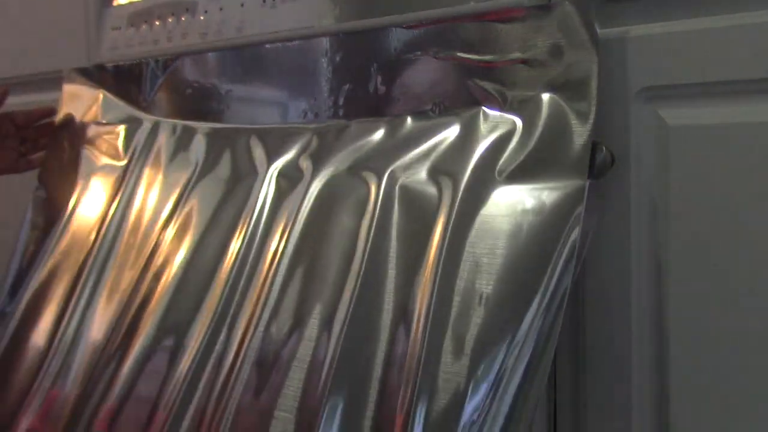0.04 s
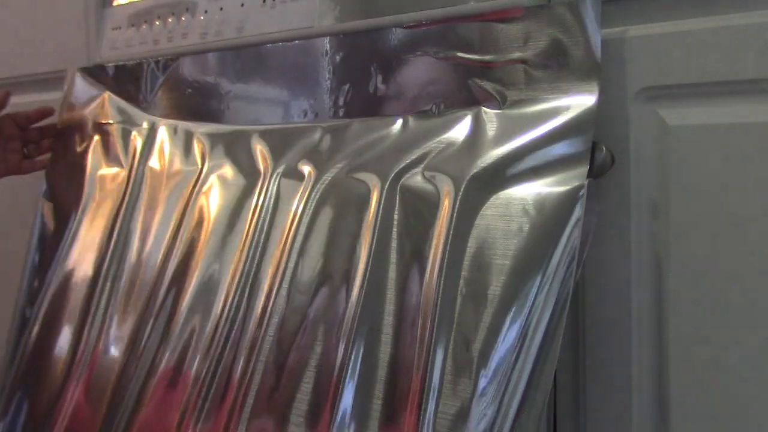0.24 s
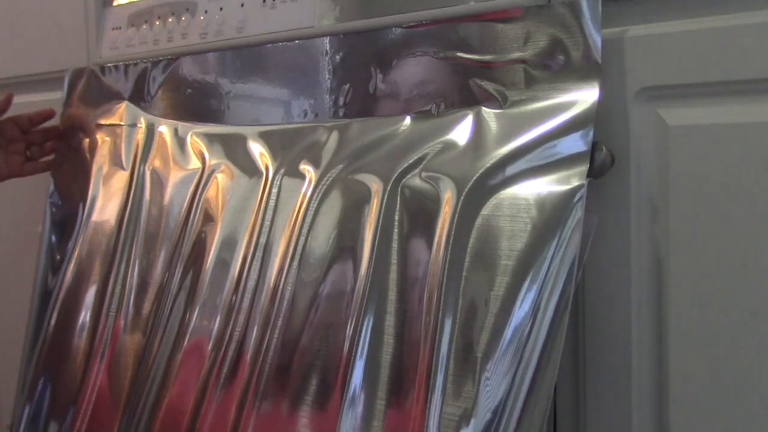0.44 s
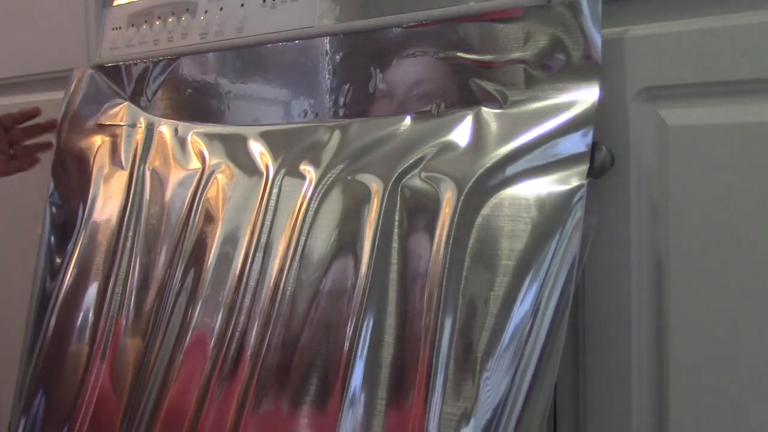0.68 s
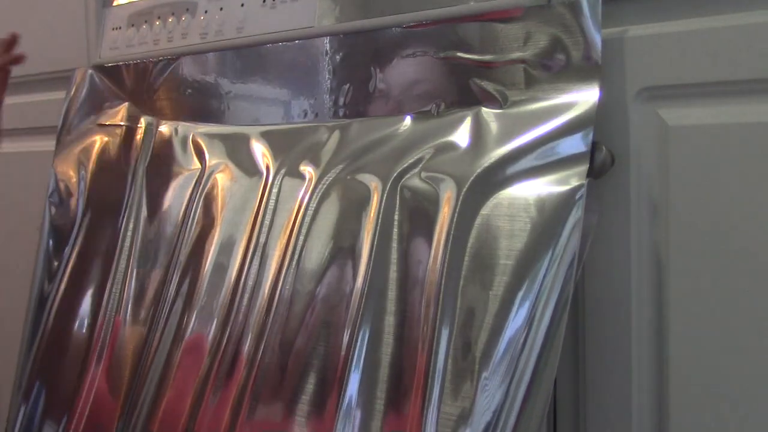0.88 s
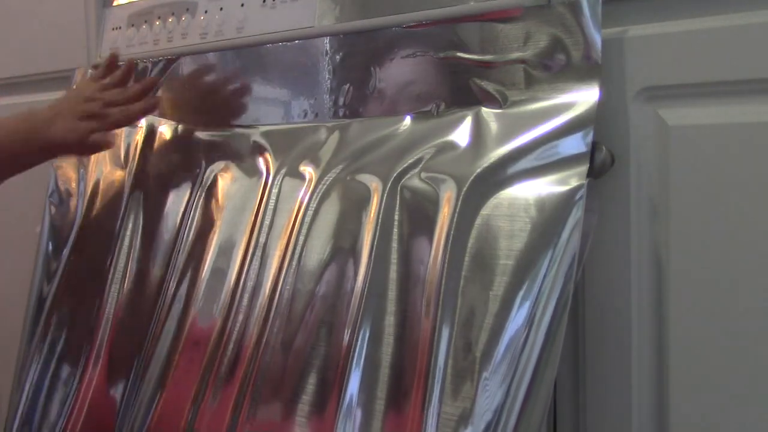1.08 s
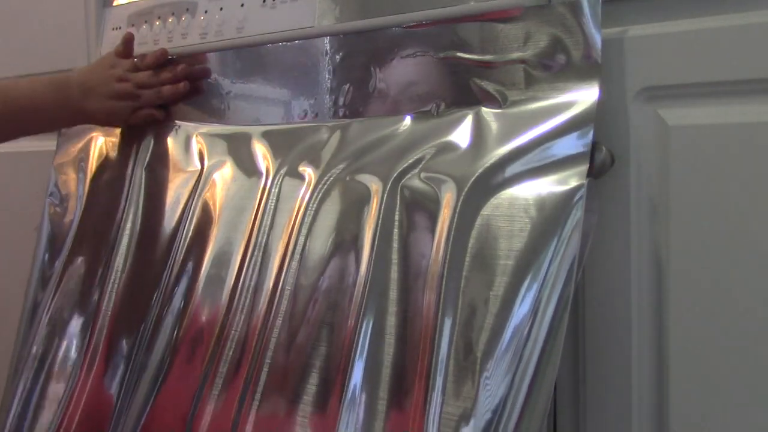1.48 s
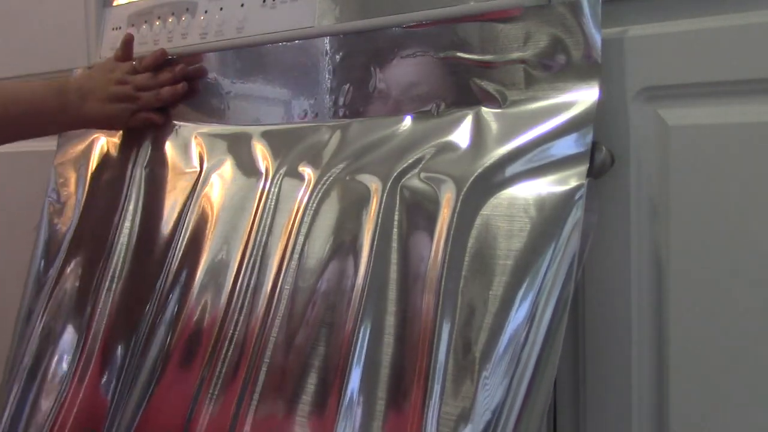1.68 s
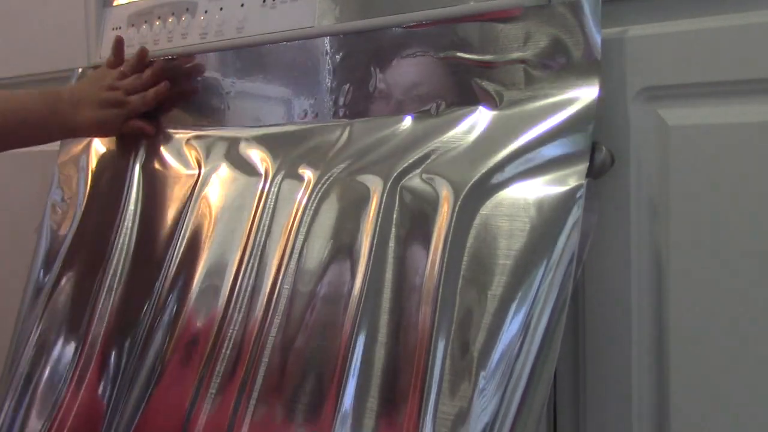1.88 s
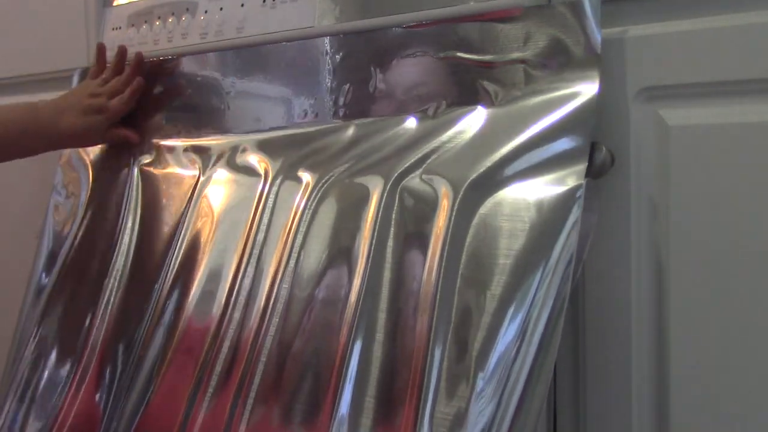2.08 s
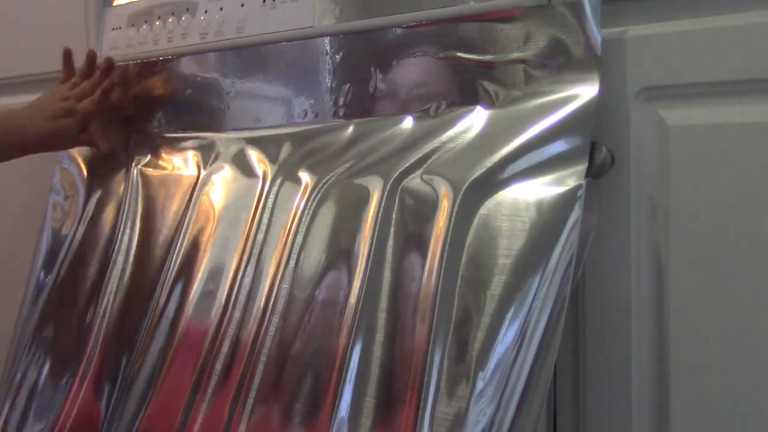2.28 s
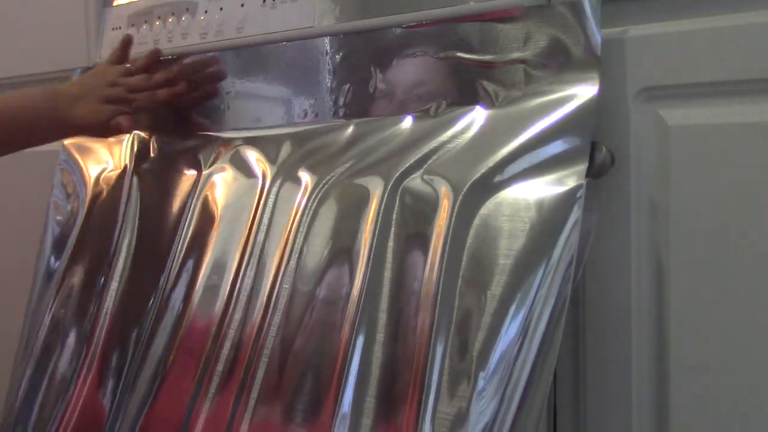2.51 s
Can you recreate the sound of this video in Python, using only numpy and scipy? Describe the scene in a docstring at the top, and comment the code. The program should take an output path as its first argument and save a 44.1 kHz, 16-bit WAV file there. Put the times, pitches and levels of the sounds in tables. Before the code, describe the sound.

Crinkling metallic film pops sharply, then a palm smooths it down with a hiss.

```python
"""A small quiet room, one close, almost mono microphone on a sheet of metallic adhesive film hanging at an
appliance. The loose film rustles as a hand presses it, and creases buckle with sharp snaps that flutter
through the sheet and ring in it. After a lull the palm lands at about 1.4 s and slides slowly, with a hiss
and a low rumble from the panel. From 1.8 s a faster, brighter stroke rubs the film flat through a second
run of snaps, dying away by 2.5 s."""
import sys
import numpy as np
from scipy import signal
from scipy.fft import rfft, irfft
from scipy.io import wavfile
from scipy.ndimage import uniform_filter1d, minimum_filter1d

SR = 44100
rng = np.random.default_rng(int(sys.argv[2]) if len(sys.argv) > 2 else 0)


def master_out(mix):
    """Clip the mix to full scale and print it as 16-bit PCM to the path in sys.argv[1]."""
    frames = np.transpose(np.atleast_2d(mix))
    ceiling = np.clip(frames, -1, 1)
    pcm = np.round(ceiling * 32767).astype(np.int16)
    wavfile.write(sys.argv[1], SR, pcm)


N = 116865

# Room tone, and its stereo width: freq_hz, relative_db
AIR_SPECTRUM = [(20, -37), (40, -30.5), (68, -8), (88, -12.5), (118, -0.5), (170, -10), (260, 1),
                (400, -4.5), (600, -7), (950, -13), (2000, -22), (4000, -29.5), (10000, -36.5),
                (13300, -43.5), (15000, -60)]
AIR_WIDTH = [(30, -14), (70, -16), (200, -18.5), (1000, -10), (4000, -5), (12000, -13)]
# Loose film rustling: time_s, level_db
RUSTLE_LEVELS = [(0, -41), (.1, -45), (.14, -46), (.23, -51.5), (.33, -41), (.39, -36.5), (.44, -40.5),
                 (.48, -44), (.53, -46), (.56, -70), (.65, -48), (.705, -48), (.735, -37), (.77, -51),
                 (.86, -54.5), (1.34, -87), (1.385, -33), (1.45, -44.5), (1.6, -66), (2.65, -79)]
# Its tone: freq_hz, relative_db
RUSTLE_SPECTRUM = [(60, -37), (250, -4.5), (600, -5.5), (1200, 2.5), (2600, -5), (4000, -8.5),
                   (7000, -10.5), (10000, -15.5), (13500, -24.5), (15000, -44)]
# Wall reflections by band: low_edge_hz, level_db, t60_s
ROOM_BANDS = [(107, 4.5, 0.31), (400, 6.5, 0.19), (900, -1.5, 0.23), (1800, -5, .29), (3500, -4, 0.25),
              (7040, -7.5, 0.14)]
# Buckling creases: start_s, build_ms, flutter_ms, pop_db, pop_low_hz, pop_high_hz, facet_hz,
# crack_db, crack_top_hz, thump_db, send_db (into the sheet and the room)
CREASES = [ (0.1477, 0.5, 7, -21.5, 540, 2050, 639, -54, 5000, -35, -2),
           (0.2465, .4, 5.8, -37, 576, 2150, 1170, -53, 9000, -45, 4.5),
           (0.2610, 6.7, 7, -31, 785, 1800, 1200, -70, 6000, -59, 1.5),
           (0.2753, 0.019, 8.1, -14, 930, 2700, 1219, -29.5, 4300, -43, -1.5),
           (0.3110, .5, 4.5, -32, 900, 2400, 1200, -48, 11000, -44, -5),
           (0.3275, .5, 4, -36, 900, 2400, 1210, -52, 10000, -59, 2),
           (0.3460, 0.25, 5.8, -23, 940, 1800, 1620, -38.5, 6000, -33, -2),
           (0.4024, 2.7, 4.7, -24.5, 805, 2740, 987, -33, 9300, -35, -1.5),
           (0.4335, 0.56, 3.7, -36, 900, 3380, 1020, -40.5, 8000, -48, -6),
           (0.5019, 2.2, 5.8, -35.5, 600, 2760, 2150, -42, 8000, -42, -3),
           (0.5100, 1, 2.6, -36, 400, 2050, 596, -55, 8000, -36.5, -14),
           (0.6417, 0.31, 4.7, -23.5, 840, 2780, 2030, -31.5, 9150, -37.5, -0.5),
           (0.68, 1.2, 4.5, -42, 1100, 3500, 2020, -42, 9200, -81, 7.5),
           (0.7242, 0.34, 3.2, -15, 1110, 2860, 2760, -23, 8000, -36, -3),
           (0.7523, 0.43, 6.7, -26.5, 600, 2430, 1320, -38.5, 8500, -46, -1),
           (1.3914, 0.77, 7, -23, 517, 2500, 597, -37.5, 8150, -29.5, -5),
           (1.5110, 0.28, 2.6, -32.5, 850, 1400, 965, -58, 6000, -37, -4.5),
           (1.7540, .3, 2.4, -42.5, 1600, 3000, 2190, -56, 6000, -43, 5),
           (1.8890, 0.38, 7, -31, 900, 2090, 1350, -60, 6000, -62, -2),
           (1.9259, 0.54, 2.6, -43.5, 800, 2920, 1300, -55, 5000, -41.5, 17),
           (1.9424, 3.5, 5.2, -18, 864, 1350, 986, -58, 4500, -30, -10),
           (2.1199, 0.12, 5.3, -16, 840, 2120, 1270, -43, 4500, -27, -8),
           (2.1602, .5, 2, -36, 1000, 2300, 1600, -57, 5950, -45, -7),
           (2.1665, 0.39, 4.7, -27, 790, 1800, 1240, -60, 6000, -39, -2.5),
           (2.182, 0.23, 3.5, -26.5, 1180, 2820, 1990, -60, 6000, -35, -7),
           (2.1879, .8, 4, -24, 800, 2340, 870, -55, 6000, -25, -2.5),
           (2.1986, 0.022, 3.9, -8.5, 1560, 2850, 1542, -31, 5500, -41, -7),
           (2.2310, 0.26, 1.8, -33, 2400, 4000, 3300, -41, 8000, -53, -10),
           (2.2462, 1.3, 4.4, -37, 1500, 4060, 2990, -42, 8000, -39, 2),
           (2.281, .3, 3.5, -36.5, 1200, 3500, 2000, -41.5, 9200, -52, 7.5),
           (2.3340, 0.4, 4.1, -19, 1310, 2380, 2890, -54, 4500, -39, -2), ]
# Resonances of the sheet and panel: pitch_hz, level_db, t60_s
SHEET_MODES = [(252, -13, 0.22), (334, -19, 0.6), (497, 15, 0.75), (634, 6, 0.083), (986, 11, .16),
               (1185, -2, 0.39), (1606, -12, 0.26), (1727, -29, 0.21), (2117, 5, 0.1), (2225, 10, .12),
               (2910, -6, 0.099)]
# First, slow stroke of the palm: time_s, level_db
SLOW_STROKE_LEVELS = [(1.3, -52), (1.42, -45), (1.53, -41), (1.65, -39.5), (1.69, -45), (1.74, -39),
                      (1.85, -53), (2.0, -38.5), (2.3, -70)]
# Its tone: freq_hz, relative_db
SLOW_STROKE_SPECTRUM = [(300, -12), (600, -0.5), (1000, -3.5), (2200, -6), (3200, -11), (4200, -13.5),
                        (5150, -10), (6000, -18.5), (9000, -20.5), (13500, -26.5), (15000, -50)]
# Panel rumbling under the palm: time_s, level_db
PANEL_LEVELS = [(1.3, -51.5), (1.42, -63), (1.56, -34.5), (1.66, -37.5), (1.7, -40.5), (1.77, -36),
                (1.88, -46.5), (1.99, -48), (2.1, -39.5), (2.3, -45), (2.45, -79)]
# Its tone: freq_hz, relative_db
PANEL_SPECTRUM = [(60, -37), (140, -5), (225, 2), (330, 4.5), (480, -8.5), (610, -8.5), (900, -20),
                  (2000, -55)]
# Second, faster and brighter stroke: time_s, level_db
FAST_STROKE_LEVELS = [(1.68, -78), (1.80, -40.5), (1.92, -41), (1.96, -45.5), (1.99, -37), (2.1, -37),
                      (2.22, -34.5), (2.3, -39.5), (2.38, -39), (2.42, -51), (2.5, -55)]
# Its tone: freq_hz, relative_db
FAST_STROKE_SPECTRUM = [(300, -3.5), (700, -5.5), (1500, 0.5), (2700, 2.5), (3700, -7.5), (5200, -6),
                        (7800, -5), (9200, -2), (11000, -11), (13500, -17), (15000, -42)]
# Stereo width by frequency, nearly mono and a little wider in the treble: freq_hz, gain_db
STEREO_WIDTH = [(100, -28), (500, -38), (1500, -21), (3000, -17.5), (5000, -16.5), (8000, -20),
                (12000, -9.5)]

ROOM_DELAY_S, ROOM_BUILD_S = 0.0056, 0.002
SLIPS_PER_S = 5000
CRACK_MS, THUMP_MS, FACET_T60_S = 4.1, 6.9, 0.038
SNAP_SAMPLES, LEAD_SAMPLES = SR // 10, SR // 50  # one snap, and the part before its click


def undb(db):
    """Decibels to gain."""
    return 10 ** (np.asarray(db) / 20)


def unit(x):
    """Scale to an energy of one."""
    return x / np.sqrt(np.sum(x ** 2) + 1e-18)


def band(x, low_hz, high_hz, order):
    """Causal band-pass; the order sets how steep the high edge is."""
    highpass = signal.butter(2, low_hz, "high", fs=SR, output="sos")
    lowpass = signal.butter(order, high_hz, fs=SR, output="sos")
    return signal.sosfilt(np.vstack([highpass, lowpass]), x)


def equalise(x, curve):
    """Filter by a curve of freq_hz, gain_db points."""
    hz, db = np.array(curve).T
    freqs = np.maximum(np.fft.rfftfreq(N, 1 / SR), 1)
    return irfft(rfft(x) * undb(np.interp(np.log(freqs), np.log(hz), db)), N)


def colour(x, spectrum):
    """Filter by a spectrum and scale to an rms of one."""
    return unit(equalise(x, spectrum)) * np.sqrt(N)


def room_tone(level_db=-43):
    """Still air in the room: a steady, low noise."""
    return colour(rng.standard_normal(N), AIR_SPECTRUM) * undb(level_db)


def friction(levels, spectrum, spread_db=3, smear_db=0):
    """Dense tiny slips of uneven size, smeared by the room, swelling along a level curve."""
    slips = (rng.random(N) < SLIPS_PER_S / SR) * rng.choice([-1, 1], N)
    slips = slips * undb(spread_db * np.minimum(rng.exponential(size=N), 6))
    swell = undb(np.interp(np.arange(N) / SR, *np.array(levels).T))
    return colour(slips + undb(smear_db) * room(slips), spectrum) * swell


def film_rustle():
    """The loose film rustles in tiny slips."""
    return friction(RUSTLE_LEVELS, RUSTLE_SPECTRUM, spread_db=2.5)


def room(x):
    """Dense reflections from near walls; the treble dies first."""
    t = np.arange(SR // 2) / SR
    freqs = np.fft.rfftfreq(len(t), 1 / SR)
    noise = rfft(rng.standard_normal(len(t)))
    onset = np.clip((t - ROOM_DELAY_S) / ROOM_BUILD_S, 0, 1)
    high_edges = [row[0] for row in ROOM_BANDS[1:]] + [SR / 2]
    tail = 0
    for (low_hz, level_db, t60_s), high_hz in zip(ROOM_BANDS, high_edges):
        reflections = irfft(noise * ((freqs >= low_hz) & (freqs < high_hz)), len(t))
        tail += undb(level_db) * reflections * unit(onset * np.exp(-np.log(1000) * t / t60_s))
    return signal.fftconvolve(x, tail)[:N]


def flutter(envelope):
    """Flutter through the sheet: a short noise burst with its strongest spectral peaks evened out."""
    spectrum = rfft(rng.standard_normal(len(envelope)) * envelope)
    return irfft(spectrum / np.sqrt(np.abs(spectrum) + 1e-12), len(envelope)) * np.sqrt(envelope)


def flip(build_ms, decay_ms, low_hz, high_hz, flutter_db=8.5, order=4):
    """One band of a crease flipping. Rows: click with flutter, bare click."""
    ms = (np.arange(SNAP_SAMPLES) - LEAD_SAMPLES) / SR * 1000
    envelope = np.exp(np.where(ms < 0, ms / max(build_ms, .02), -ms / decay_ms))
    click = unit(band(signal.unit_impulse(SNAP_SAMPLES, LEAD_SAMPLES), low_hz, high_hz, order))
    burst = unit(band(flutter(envelope), low_hz, high_hz, order))
    flutter_gain = undb(flutter_db) * (1 + build_ms)  # the slower the build-up, the less click
    return np.array([unit(click + flutter_gain * burst), click])


def crease_snaps():
    """Creases buckle: a pop, a ringing facet, a bright crack and a panel thump. Rows: direct, send."""
    track = np.zeros((2, N + SR))
    age_s = np.maximum(np.arange(SNAP_SAMPLES) - LEAD_SAMPLES, 0) / SR
    scale = np.sqrt(SR / 100)  # an energy of one becomes an rms of one over 10 ms
    for (start_s, build_ms, flutter_ms, pop_db, pop_low_hz, pop_high_hz, facet_hz,
         crack_db, crack_top_hz, thump_db, send_db) in CREASES:
        pop = flip(build_ms, flutter_ms, pop_low_hz, pop_high_hz)
        facet = unit(np.sin(2 * np.pi * facet_hz * age_s) * np.exp(-np.log(1000) * age_s / FACET_T60_S))
        facet = facet * undb([[-6], [-14]])  # direct, send
        crack = flip(build_ms, CRACK_MS, low_hz=4300, high_hz=crack_top_hz, flutter_db=11)
        thump = flip(build_ms, THUMP_MS, low_hz=196, high_hz=455, order=2)
        snap = undb(pop_db) * (pop + facet) + undb(crack_db) * crack + undb(thump_db) * thump
        snap[1] *= undb(send_db)
        start = int(start_s * SR) - LEAD_SAMPLES
        track[:, start:start + SNAP_SAMPLES] += scale * snap
    return track[:, :N]


def sheet_ring(clicks):
    """The sheet and the panel ring briefly after each snap."""
    t = np.arange(SR // 2) / SR
    ring = 0
    for pitch_hz, level_db, t60_s in SHEET_MODES:
        rate = np.log(1000) / t60_s
        ring += undb(level_db) * 2 * rate / SR * np.exp(-rate * t) * np.cos(2 * np.pi * pitch_hz * t)
    return signal.fftconvolve(clicks, ring)[:N]


def palm_rub():
    """The palm hisses over the film in two strokes while the panel rumbles beneath it."""
    slow_stroke = friction(SLOW_STROKE_LEVELS, SLOW_STROKE_SPECTRUM, smear_db=-6.5)
    rumble = friction(PANEL_LEVELS, PANEL_SPECTRUM)
    fast_stroke = friction(FAST_STROKE_LEVELS, FAST_STROKE_SPECTRUM, smear_db=7)
    return slow_stroke + rumble + fast_stroke


def scene():
    """Rustle, snaps and rubbing from close by, over room tone, in a narrow stereo image."""
    rustle = film_rustle()
    snaps, clicks = crease_snaps()
    ring = undb(-4) * sheet_ring(clicks)
    spill = clicks + undb(-7) * ring  # what the snaps throw into the room
    palm = palm_rub()
    mid = room_tone() + rustle + snaps + ring + room(spill) + palm
    diffuse = room(rustle + spill + palm)
    side = equalise(diffuse + undb(-5) * snaps, STEREO_WIDTH) + equalise(room_tone(), AIR_WIDTH)
    return np.array([mid + side, mid - side])


def record(dry):
    """Behind the microphone: a bass cut, a fast limiter for the loudest snaps and a steep top cut."""
    bass_cut_hz, top_cut_hz = 48, 15600
    ceiling, window = .93, int(.002 * SR)
    dry = signal.sosfilt(signal.butter(2, bass_cut_hz, "high", fs=SR, output="sos"), dry)
    gain = ceiling / np.maximum(np.abs(dry).max(axis=0), ceiling)
    gain = uniform_filter1d(minimum_filter1d(gain, window), window)
    return signal.sosfilt(signal.ellip(8, .2, 80, top_cut_hz, fs=SR, output="sos"), dry * gain)


dry = scene()
out = record(dry)
master_out(out)
```